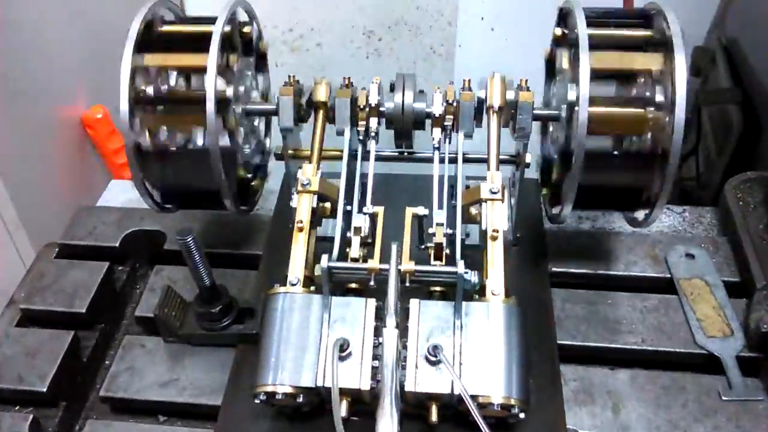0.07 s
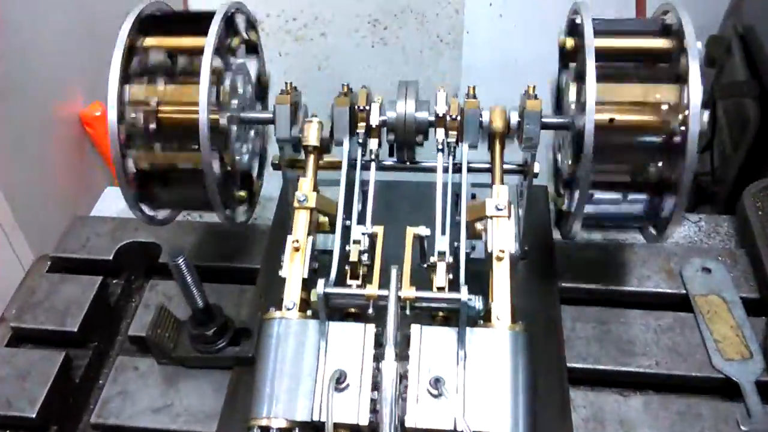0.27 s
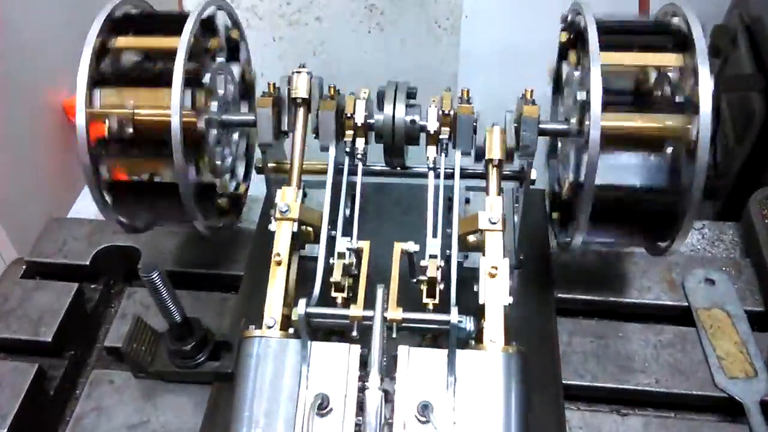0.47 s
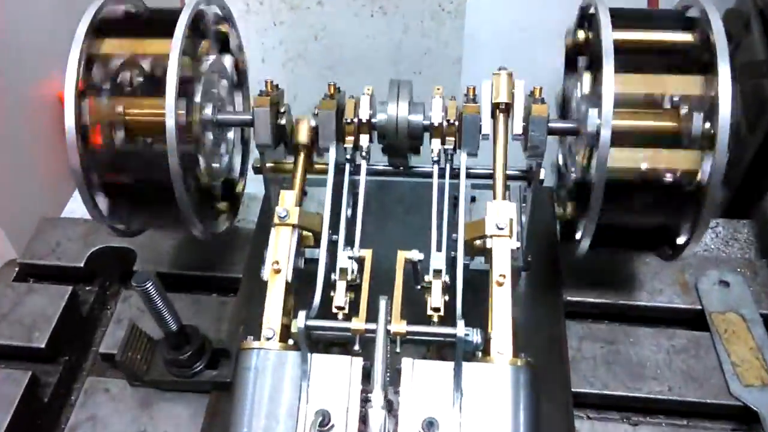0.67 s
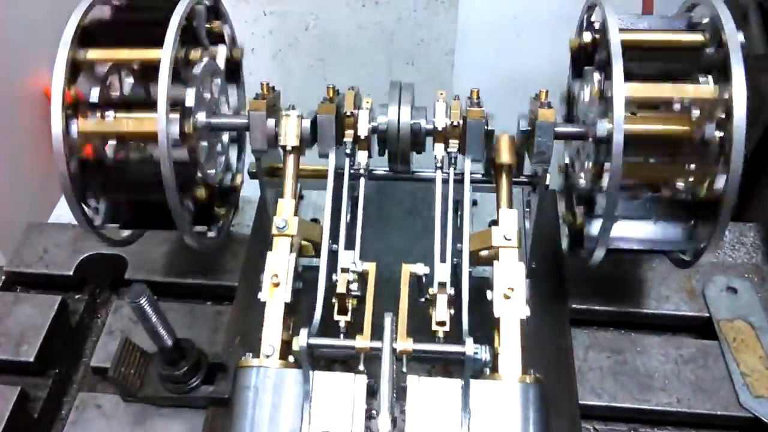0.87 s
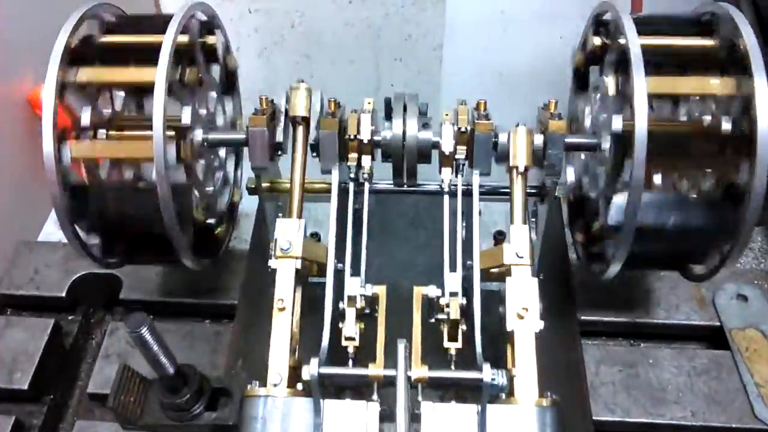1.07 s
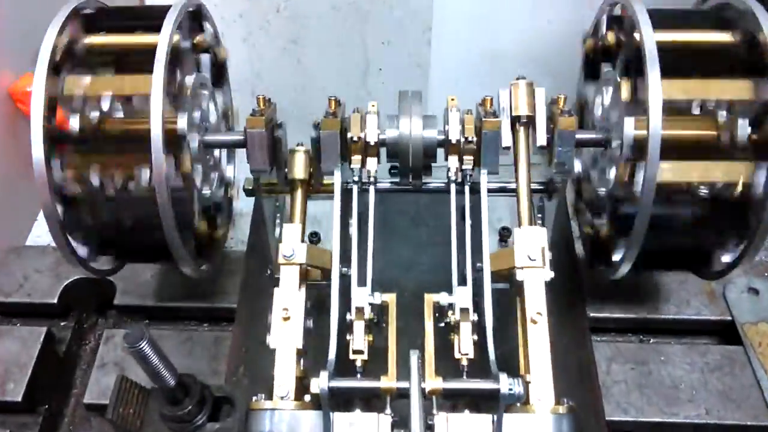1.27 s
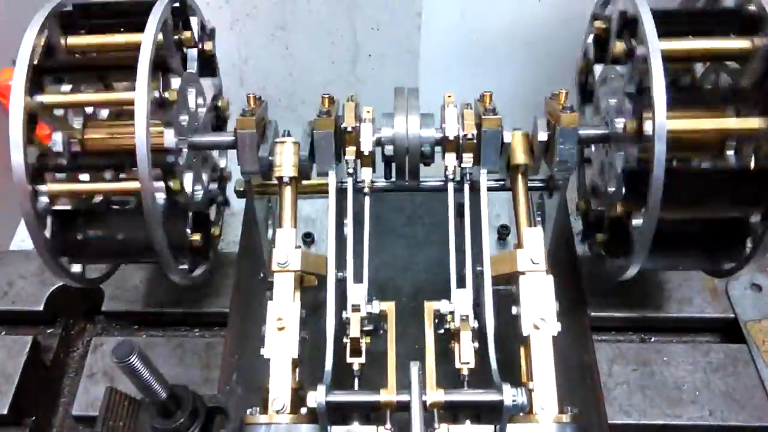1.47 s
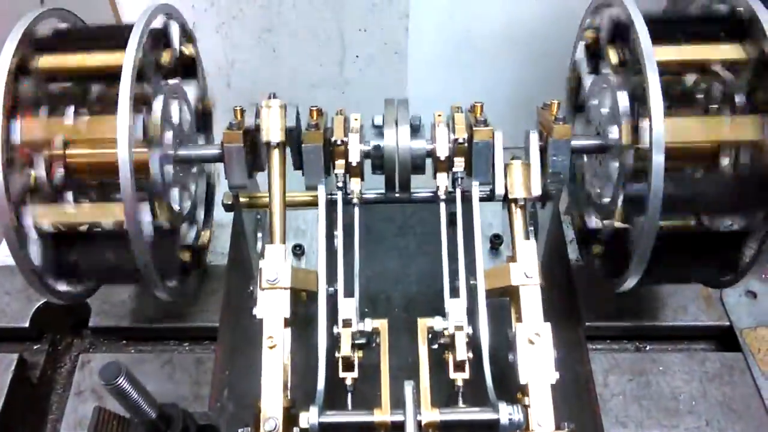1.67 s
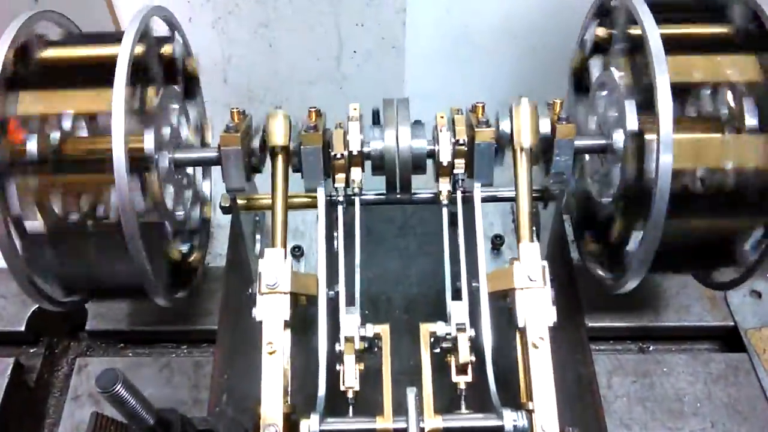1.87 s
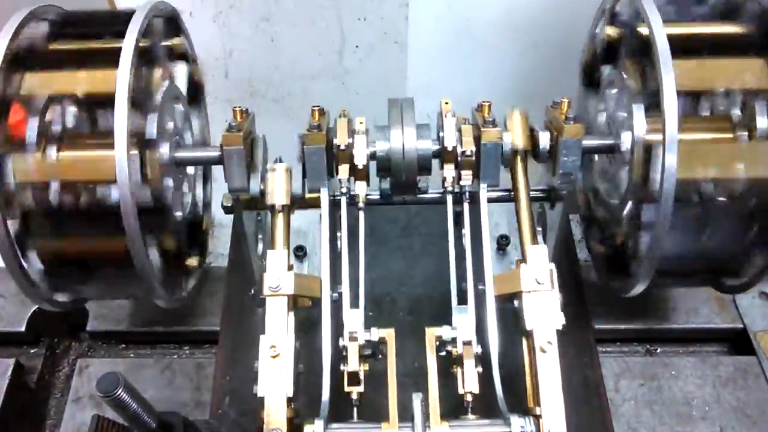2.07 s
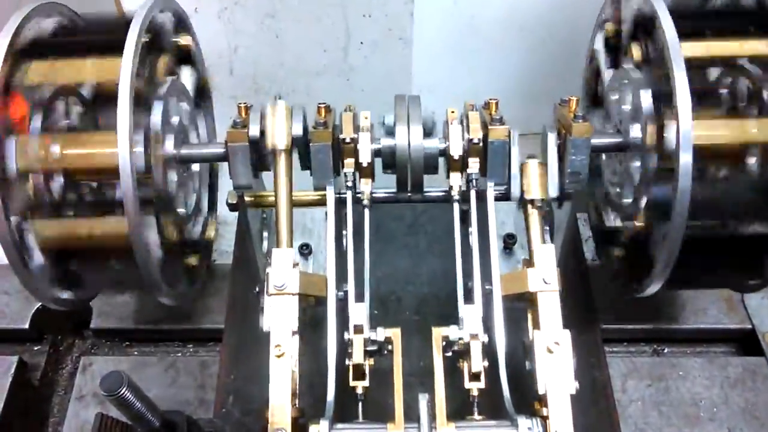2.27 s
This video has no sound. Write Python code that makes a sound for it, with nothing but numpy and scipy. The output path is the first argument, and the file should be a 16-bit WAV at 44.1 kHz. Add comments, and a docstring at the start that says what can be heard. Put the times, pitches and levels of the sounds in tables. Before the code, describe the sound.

Compressed air hisses continuously from a slow model engine, with a wavering high note, brief chuffs and irregular ticks from loose rods. The microphone edges closer and catches a soft thump of air, over a faint workshop rumble.

```python
"""A two-cylinder model engine turns slowly on compressed air, which sings in a small hollow.
Air leaks all the time, hisses harder with each piston stroke and puffs out of the exhaust after it.
Loose rods knock on the base and the valve gear ticks. The microphone moves closer while a draught
thumps it, mostly on the right. Behind it all, the workshop rumbles softly."""
import sys
import numpy as np
from scipy import signal
from scipy.fft import rfft, irfft, next_fast_len
from scipy.io import wavfile
from scipy.ndimage import uniform_filter1d, map_coordinates

SR = 44100
rng = np.random.default_rng(int(sys.argv[2]) if len(sys.argv) > 2 else 0)


def store_wav(level_fs):
    """Save 16-bit WAV to argv[1]."""
    pcm = np.round(np.clip(np.atleast_2d(level_fs), -1, 1) * 32767)
    wavfile.write(sys.argv[1], SR, pcm.T.astype(np.int16))


N = 102003

# How alike the hiss is on the left and right: f/Hz, likeness (1 = fully alike)
HISS_LIKENESS = [(50, 0.14), (250, 0.74), (750, 0.8), (1300, 1), (1800, 0.26), (2300, .55), (3000, 0.41),
                 (5400, 1), (7500, 0.12), (15000, .05)]


def singing_hollow(likeness=0.96, sputter_db=0.96, trim_db=-0.65, spit_s=0.0027):
    """Escaping air makes a small hollow ring. The note is purer close by and flares with each spit."""
    # Tone of the hollow: f/Hz, level from afar/dB, level close by/dB
    tone = [(1310, -30.5, -53), (1660, -10, -4.5), (1933, -14, -2.5), (2046, -1, 10.5), (2360, 2, 12.5),
            (2426, 1.5, 2), (2714, -6, 1), (3300, -34, -43), (4470, -33, -60)]
    # Rise and fall of the note: t/s, level/dB
    loudness = [(0, -34), (0.08, -52), (0.2, -41), (0.33, -30.5), (0.4, -31.5), (0.46, -37.5), (0.51, -32),
                (0.59, -39.5), (0.72, -34), (0.79, -32), (0.84, -29.5), (0.87, -32), (0.92, -28.5),
                (0.97, -31.5), (1.08, -32), (1.3, -36.5), (1.36, -30.5), (1.42, -28.5), (1.46, -25),
                (1.495, -37), (1.52, -27.5), (1.67, -30), (1.76, -30.5), (1.86, -36.5), (1.96, -34),
                (2.01, -32.5), (2.14, -28.5), (2.23, -26), (2.3, -32.5)]
    # Where the note sits: t/s, left minus right/dB
    position = [(0, 0), (.7, 0.5), (1.2, -3.5), (1.42, -4), (2.3, -5)]
    # Short spits of air: t/s, boost/dB
    spits = [(0.758, 10), (.833, 7.5), (1.087, 4), (1.145, 8), (1.418, 7), (1.457, 0.5), (1.542, 2)]
    t = np.arange(N) / SR
    jet = stereo_noise([(2000, likeness)]) * amp(sputter_db * wobble(200))
    far = unit_rms(filtered(jet, lambda hz: amp(look_up(tone, hz))))
    near = unit_rms(filtered(jet, lambda hz: amp(look_up(tone, hz, column=2))))
    closeness = curve([(0.57, 0), (1.8, 1)])  # the microphone moves into line with the jet
    note = far + closeness * (near - far)
    flare_db = sum(db * np.exp(-((t - s) / spit_s) ** 2) for s, db in spits)
    return note * amp(curve(loudness) + flare_db + trim_db) * pan(curve(position))


def piston_strokes(attack_s=0.069, release_s=0.11, sputter_db=0.65, waver=0.02, likeness=0.17):
    """More air escapes while a piston is under pressure, sputtering through oil and whistling thinly."""
    # Working strokes: start/s, end/s, level/dB, frequency ratio of the hiss, whistle level/dB
    strokes = [(-.3, 0.046, -22, 0.55, -10), (0.187, 0.516, 0, 1.035, -1), (0.693, 1.057, 0.5, 1.053, 0),
               (1.289, 1.713, 1, 1.01, 1), (2.002, 2.353, 1.5, 1.02, -2)]
    # Hiss of a stroke: f/Hz, level/dB, left minus right/dB
    tone = [(240, -89, 1), (393, -75, 0.5), (730, -87.5, -3.5), (1030, -75.5, 1), (1390, -74, 7),
            (1900, -80.5, 9.5), (2600, -66.5, -22), (3040, -77, 7), (3150, -71.5, -8), (3800, -79.5, 4.5),
            (4830, -79.5, -10), (5670, -78.5, 0), (5650, -88, -9), (6680, -75.5, -22), (6850, -98, -3),
            (8600, -84, -5), (10600, -109.5, -35), (12100, -93, 10), (15500, -99.1, -1.4)]
    # Thin whistles: f/Hz, width/Hz, level/dB, left minus right/dB, share that follows the strokes
    whistles = [(5330, 810, -45.5, -13, 1), (9490, 880, -46.5, -2, 0.5)]
    hiss, whistling, drive = np.zeros((2, N)), np.zeros((2, N)), np.zeros(N)
    for start, end, db, ratio, whistle_db in strokes:
        flow = amp(db) * valve(start, end, attack_s, release_s)
        hiss += shaped_noise(tone, HISS_LIKENESS, ratio) * flow
        drive += flow * amp(whistle_db)
    for hz, width_hz, db, side_db, share in whistles:
        whistle = noise_band(hz * (1 + waver * wobble(25)), width_hz, likeness)
        whistling += whistle * amp(db) * pan(side_db) * (1 + share * (drive - 1))
    return hiss * amp(sputter_db * wobble(170)) + whistling


def air_leak(rise_db_per_s=0.57, drift_db=1.06, flutter_db=0.7):
    """The air supply and seals hiss all the time, growing louder as the microphone comes closer."""
    # Hiss of the leak: f/Hz, level/dB, left minus right/dB
    tone = [(257, -86.5, -7.5), (503, -83.5, 2.5), (700, -79.5, 6), (1020, -78.3, -4), (1230, -77, 3),
            (1400, -76.5, 4), (1944, -64, 5), (2130, -63, 1.5), (2680, -70.5, -2), (3560, -77.5, 1.5),
            (4150, -82, -6), (5320, -77.5, -11), (5830, -82.5, -3.5), (8200, -82, -7.5), (8520, -80, -9),
            (9960, -79.5, -0.5), (12050, -87.5, 0.5), (15300, -95, 0.2)]
    t = np.arange(N) / SR
    hiss = shaped_noise(tone, HISS_LIKENESS)
    rise_db = rise_db_per_s * (t - t.mean())
    return hiss * amp(rise_db + drift_db * wobble(11.23) + flutter_db * wobble(120))


def exhaust_puffs(attack_s=0.015, release_s=0.036, rough_db=0.26, from_hz=3114, to_hz=2310):
    """The exhaust opens briefly and lets out a chuff, with a chirp that falls as the pressure drops."""
    # Exhaust openings: start/s, length/s, level/dB
    puffs = [(0.123, 0.025, -3), (0.616, 0.044, -4.5), (1.178, 0.042, -2.5), (1.893, 0.038, -4)]
    # Tone of the chuff: f/Hz, level/dB, left minus right/dB
    tone = [(353, -89.5, 10), (650, -70.5, -4.5), (1170, -65, 3), (1620, -63.5, 5), (2100, -60.5, 11),
            (2800, -55.5, -4), (4000, -72.5, 2), (5000, -69, -14.5), (6500, -77.5, -4.2), (8700, -68, -2),
            (11700, -78.5, -2), (15500, -88, 5)]
    # How alike its two sides are: f/Hz, likeness
    alike = [(700, 0.6), (1500, 0.39), (2200, 0.056), (5000, 0.17), (9000, 0.2)]
    opening, pitch_points = np.zeros(N), []
    for start, length, db in puffs:
        opening += amp(db) * valve(start, start + length, attack_s, release_s)
        pitch_points += [(start, from_hz), (start + length, to_hz)]
    chirp = noise_band(curve(pitch_points), width_hz=620, likeness=0.3) * amp(-31.5) * pan(19)
    chuff = shaped_noise(tone, alike) * amp(rough_db * wobble(350))
    return (chuff + chirp) * opening


def rod_knocks(ring_db=1.5, side_db=5.5, attack_s=0.00093, stagger_s=0.00055, click_fade_s=0.035):
    """Loose rods and bearings hit each other. Each hit rings the base and adds a short, dull click."""
    # Hits: t/s, level/dB, favoured f/Hz, click level/dB, ring time ratio
    hits = [(.028, -30, 1010, -7, 1.1), (.052, -33, 1100, -5, 0.94), (.078, -31, 900, -8, 0.63),
            (.145, -34, 910, 0.5, 1.1), (.212, -27.5, 890, -14, 0.67), (.225, -30.5, 950, -4.5, 0.69),
            (.233, -31.5, 840, -0.5, 1.8), (.248, -54, 650, -14, 1.1), (.522, -26, 760, -16, 0.37),
            (.646, -54, 900, -8, 1.3), (.712, -32.5, 780, -7, 0.89), (.723, -28, 860, -8, 0.59),
            (.732, -32.5, 875, -0.5, 1), (.748, -28, 650, -9, 0.56), (.985, -32.5, 920, -7.5, 1.8),
            (1.064, -22.5, 820, -18, 0.41), (1.208, -26.5, 695, -6, 0.71), (1.331, -30.5, 650, -9, 0.41),
            (1.47, -34, 650, -20, 0.7), (1.767, -28, 680, -20, 0.48), (1.918, -31, 800, 0, 0.84),
            (1.996, -27.5, 950, -10, 0.57), (2.018, -37, 750, 1, 1.4), (2.025, -31, 640, -8, 1.35),
            (2.048, -28.5, 616, -14, 0.75), (2.189, -32.5, 650, -17, 0.77), (2.288, -41, 800, -8, 0.69)]
    # Natural notes of the base: f/Hz, level/dB, time to fade by 60 dB/s
    base_notes = [(516, -11, 0.013), (647, -6.5, 0.11), (714, -2.5, 0.023), (844, -5, 0.034),
                  (1010, -15, 0.015), (1340, -9, 0.09), (1620, 12, 0.018)]
    # Tone of the click: f/Hz, level/dB
    click_tone = [(200, -35), (600, 1), (1700, 18), (4000, -19), (8000, 4), (14000, -28)]
    ring, clicks = np.zeros(N), np.zeros(N)
    t = np.arange(SR // 5) / SR
    for s, db, favoured_hz, click_db, ring_ratio in hits:
        for hz, note_db, fade_s in base_notes:
            scatter_db, detune = rng.normal(0, [1.5, 0.008])
            loss_db = 18 * np.log2(hz / favoured_hz) ** 2  # notes far from the favoured one are weaker
            strength_db = db + ring_db + note_db + scatter_db - loss_db
            envelope = amp(strength_db - 60 * t / (fade_s * ring_ratio)) * (1 - np.exp(-t / attack_s))
            note = np.sin(2 * np.pi * hz * (1 + detune) * t)
            add(ring, s + stagger_s * rng.random(), envelope * note)
        add(clicks, s, amp(db + click_db - 60 * t / click_fade_s) * rng.standard_normal(len(t)))
    clicks = filtered(clicks, lambda hz: amp(look_up(click_tone, hz)))
    return (ring + clicks) * pan(side_db)


def valve_ticks(fade_s=0.011, side_db=-4):
    """The valve gear snaps over with a sharp tick near the end of a puff."""
    # Snaps: t/s, level/dB
    snaps = [(.146, -32), (1.204, -21), (1.919, -43)]
    # Tone of a tick: f/Hz, level/dB
    tone = [(1500, -21), (3000, -13), (4200, -1), (5100, 12.5), (6000, -8), (9000, -20), (15000, -28)]
    bursts = np.zeros((2, N))
    t = np.arange(SR // 10) / SR
    for s, db in snaps:
        add(bursts, s, amp(db - 60 * t / fade_s) * rng.standard_normal((2, len(t))))
    return 2 * filtered(bursts, lambda hz: amp(look_up(tone, hz))) * pan(side_db)


def draught_thumps():
    """Each swirl of air passing the microphone makes one soft dip in pressure."""
    # Swirls: t/s, level/dB, f/Hz, left minus right/dB
    swirls = [(.511, -40.5, 50, -25), (0.554, -42, 65, -20), (.598, -22.5, 86, -41),
              (0.645, -32, 78.5, -27), (0.6552, -26.5, 126, -35), (0.688, -29.5, 74.6, -30),
              (0.774, -51, 55, -15), (0.89, -36.5, 70, -23), (.914, -39.5, 140, -3), (1.412, -42, 102, 16)]
    thumps = np.zeros((2, N))
    t = np.arange(N) / SR
    for s, db, hz, side_db in swirls:
        phase_squared = (np.pi * hz * (t - s)) ** 2
        dip = (2 * phase_squared - 1) * np.exp(-phase_squared)
        thumps += amp(db) * dip * pan(side_db) / np.sqrt(2)
    return thumps


def metal_reflections(x, depth_db=3.04, bands=3, frames=110):
    """Sound bouncing off nearby metal ripples the treble. The ripples drift as the microphone moves."""
    hz, _, spectrum = signal.stft(x, SR, nperseg=512)
    ripples = rng.standard_normal((2, len(hz), spectrum.shape[2] + 2 * frames))
    ripples = uniform_filter1d(ripples, bands, axis=1)  # smooth across pitch
    ripples = uniform_filter1d(ripples, frames, axis=2)[..., frames:-frames]  # and across time
    treble_weight = look_up([(2500, 0.26), (4500, 0.77)], hz)[:, None]
    gain = amp(depth_db * treble_weight * unit_rms(ripples))
    return signal.istft(spectrum * gain, SR, nperseg=512)[1][:, :N]


def room_echo(x, level_db=-11, fade_s=0.15):
    """The bench and walls send back a short, blurred echo."""
    t = np.arange(SR // 3) / SR
    tail = rng.standard_normal((2, len(t))) * amp(-60 * t / fade_s) * (t > 0.003)
    return amp(level_db) * signal.fftconvolve(x, tail / np.linalg.norm(tail[0]), axes=1)[:, :N]


def workshop_rumble():
    """A low rumble swells and sinks in the background."""
    # Tone of the rumble: f/Hz, level/dB, left minus right/dB
    tone = [(20, -85, 6), (50, -90, 0), (110, -89, 0), (192, -95.5, 3.5), (330, -94, -3), (600, -105, -9),
            (2000, -130, 0)]
    # Its swells: t/s, level/dB
    loudness = [(0, 3.5), (.5, 5.5), (1, 1.5), (1.1, 9), (1.4, 5), (1.6, 1), (1.85, 2), (2.2, 9)]
    return shaped_noise(tone, alike=[(40, 0.42), (200, 1.0)]) * amp(curve(loudness))


def amp(db):
    """Turn decibels into a gain."""
    return 10 ** (np.asarray(db) / 20)


def look_up(table, hz, column=1):
    """Read a table between its rows, on a log frequency scale."""
    rows = np.array(table, float)
    return np.interp(np.log(hz + 1), np.log(rows[:, 0] + 1), rows[:, column])


def curve(rows):
    """Join (t/s, value) points with straight lines, one value per sample."""
    return np.interp(np.arange(N) / SR, *np.transpose(rows))


def wobble(rate):
    """A smooth curve through `rate` random points a second."""
    return map_coordinates(rng.standard_normal(4096), [np.arange(N) * rate / SR], mode="wrap")


def filtered(x, response):
    """Multiply each frequency in x by response(hz)."""
    size = next_fast_len(N + SR // 2)
    return irfft(rfft(x, size) * response(np.fft.rfftfreq(size, 1 / SR)), size)[..., :N]


def unit_rms(x):
    """Scale to an average power of 1."""
    return x / np.sqrt(np.mean(x ** 2) + 1e-20)


def pan(db):
    """Left and right gains with a fixed total power; positive dB leans left."""
    gains = amp(np.array([np.atleast_1d(db), -np.atleast_1d(db)]) / 2)
    return gains / np.sqrt(np.mean(gains ** 2, axis=0))


def stereo_noise(alike):
    """White noise whose two sides are as alike as the (f/Hz, likeness) rows say."""
    # How far the left side runs ahead of the right: f/Hz, phase/rad
    lead = [(300, 0.27), (850, 0.27), (1150, 2.15), (2000, .1), (2600, 0.84), (3200, 3.13), (4200, 1.5),
            (5400, 1.85), (9000, 2)]

    def split(hz):
        angle = np.arccos(np.clip(look_up(alike, hz), -1, 1)) / 2
        return np.array([np.cos(angle), np.sin(angle)])
    mid, side = filtered(rng.standard_normal((2, N)), split)
    left_right = np.array([mid + side, mid - side])
    return filtered(left_right, lambda hz: np.exp(0.5j * look_up(lead, hz) * np.array([[1], [-1]])))


def shaped_noise(tone, alike, ratio=1):
    """Stereo noise with a table's tone and balance, shifted in frequency by ratio."""
    def response(hz):
        bass_cut = hz ** 2 / (hz ** 2 + (tone[0][0] / 2) ** 2)
        return amp(look_up(tone, hz / ratio)) * pan(look_up(tone, hz / ratio, column=2)) * bass_cut
    return np.sqrt(SR / 2) * filtered(stereo_noise(alike), response)  # table levels are per hertz


def noise_band(hz, width_hz, likeness):
    """A narrow band of stereo noise around a moving pitch."""
    def low_pass(f):
        return 1 / (1 + (2 * f / width_hz) ** 2)
    a, b = (filtered(stereo_noise([(2000, likeness)]), low_pass) for _ in range(2))
    phase = 2 * np.pi * np.cumsum(hz) / SR
    return unit_rms(a * np.cos(phase) + b * np.sin(phase))


def valve(start, end, attack_s, release_s):
    """How far a valve is open, from 0 to 1; it is half shut at `end`."""
    t = np.arange(N) / SR
    return np.clip((t - start) / attack_s, 0, 1) * np.clip((end - t) / release_s + 0.5, 0, 1)


def add(track, s, sound):
    """Mix a sound into the track at s seconds."""
    part = track[..., max(0, round(s * SR)):][..., :sound.shape[-1]]
    part += sound[..., :part.shape[-1]]


def scene():
    """The engine's air and moving parts, with the draught and the workshop."""
    clatter = rod_knocks() + valve_ticks()
    rumble = workshop_rumble()
    hiss = metal_reflections(air_leak() + piston_strokes() + exhaust_puffs())
    return singing_hollow() + hiss + clatter + room_echo(clatter) + draught_thumps() + rumble


def record(dry, top_hz=15780):
    """Cut away the very highest treble."""
    return filtered(dry, lambda hz: hz < top_hz)


dry = scene()
out = record(dry)
store_wav(out)
```